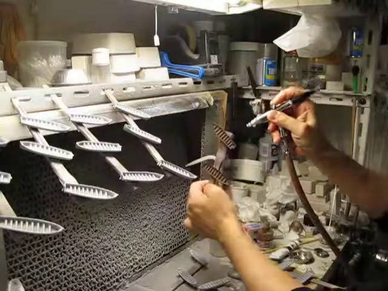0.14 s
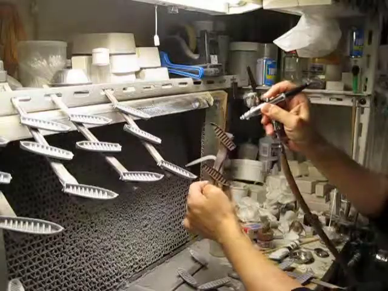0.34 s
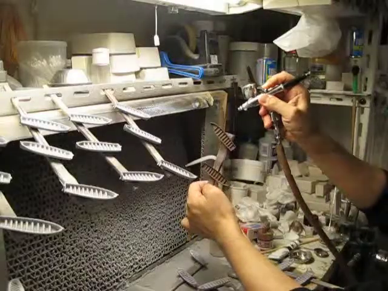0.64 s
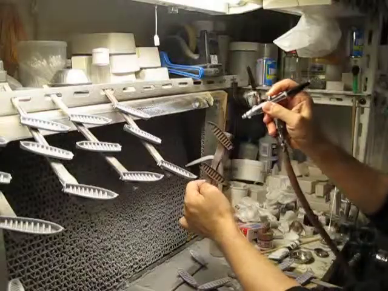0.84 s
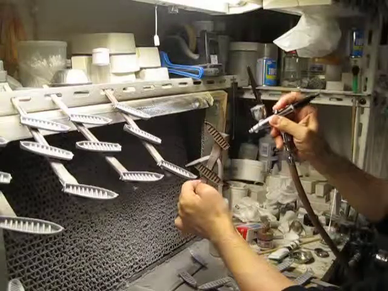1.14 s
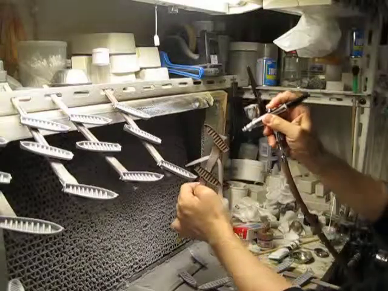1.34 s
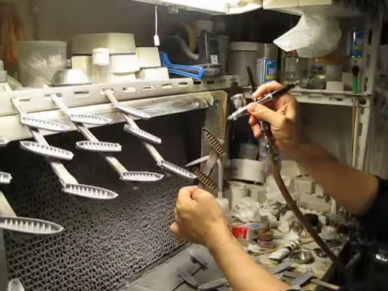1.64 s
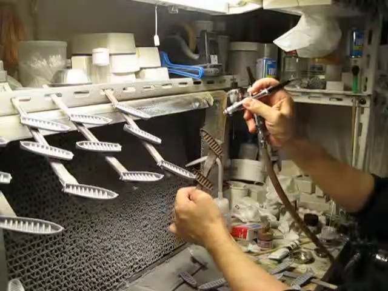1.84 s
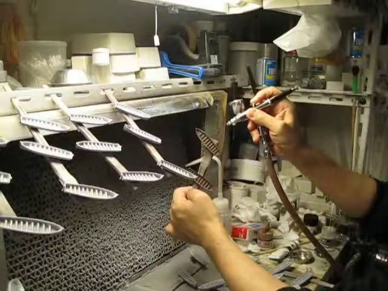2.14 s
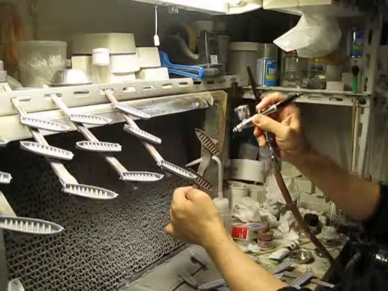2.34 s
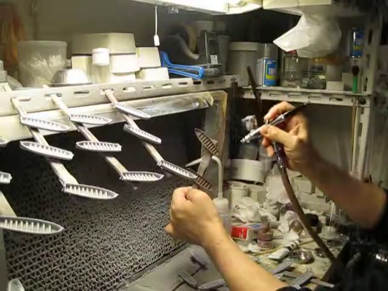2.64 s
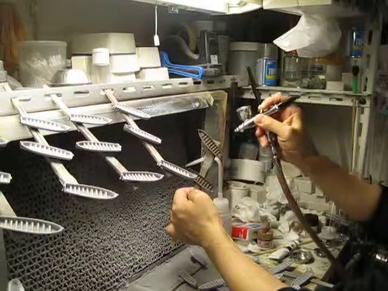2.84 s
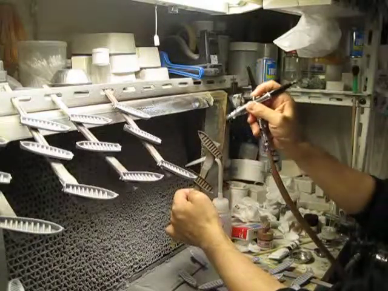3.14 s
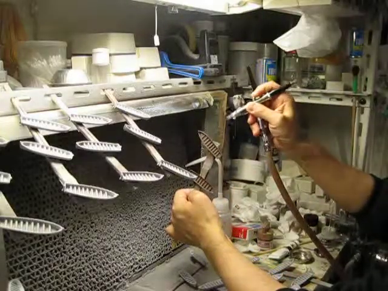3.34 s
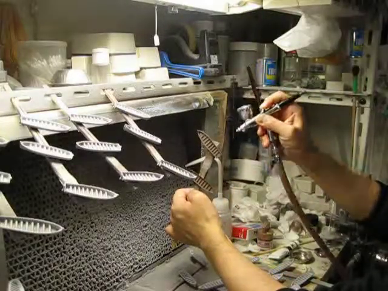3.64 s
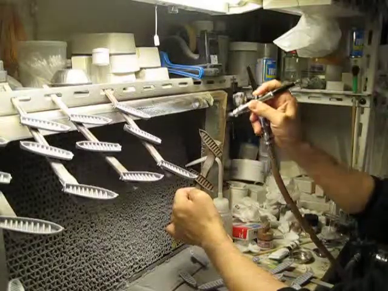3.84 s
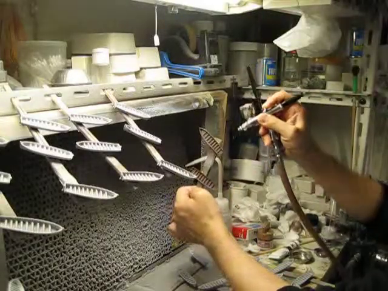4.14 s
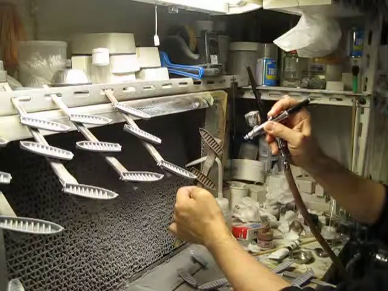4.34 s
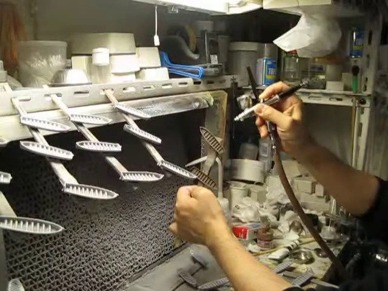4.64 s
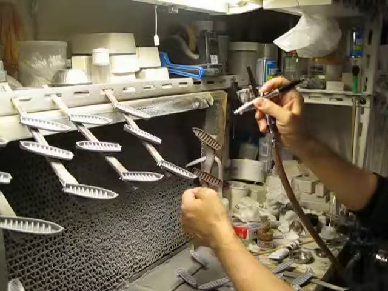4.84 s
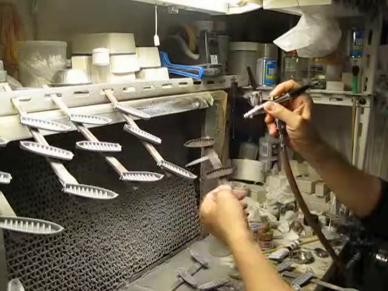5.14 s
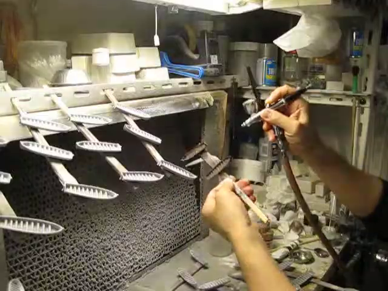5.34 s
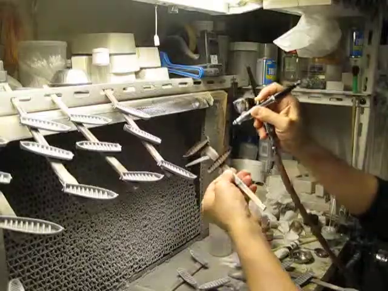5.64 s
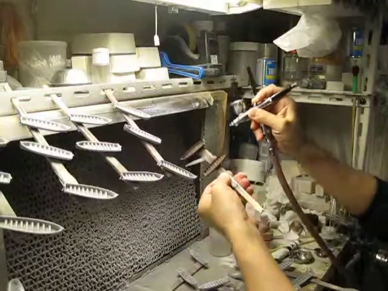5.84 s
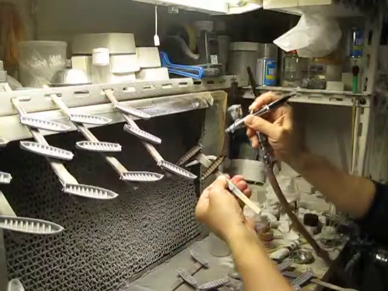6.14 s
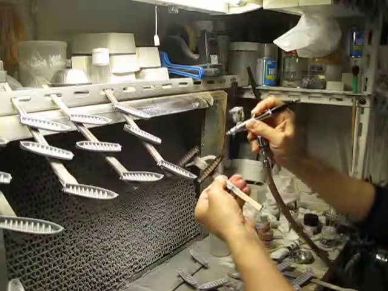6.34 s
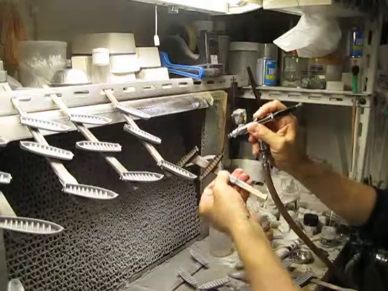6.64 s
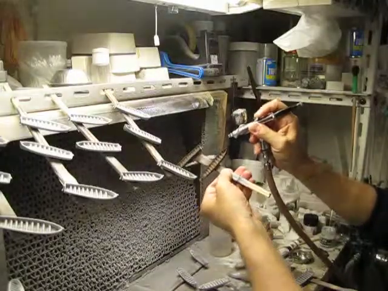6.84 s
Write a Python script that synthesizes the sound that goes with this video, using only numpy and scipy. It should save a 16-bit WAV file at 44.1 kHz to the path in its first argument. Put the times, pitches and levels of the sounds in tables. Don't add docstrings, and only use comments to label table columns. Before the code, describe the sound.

An airbrush hisses steadily, its jet swelling into quick breathy roars over small hollow parts, above a low pulsing compressor hum in a workshop.

```python
import sys
import numpy as np
from scipy import signal
from scipy.fft import rfft, irfft, next_fast_len
from scipy.io import wavfile
from scipy.ndimage import uniform_filter1d, map_coordinates

SR = 44100
rng = np.random.default_rng(int(sys.argv[2]) if len(sys.argv) > 2 else 0)


def dump_mix(stems):
    frames = np.atleast_2d(stems).T
    limited = np.clip(frames, -1, 1)
    pcm = np.round(limited * 32767).astype(np.int16)
    wavfile.write(sys.argv[1], SR, pcm)


def gain_from_decibels(decibels):
    exponent = np.asarray(decibels, float) / 20
    return 10 ** exponent


N = 307818

# (time [s], level [dB])
CAMERA_GAIN = [(0, -4.5), (1.2, -1), (1.7, -3.5), (2.6, -2), (3.0, -2), (3.5, 1), (4.0, 1), (4.8, -0.5),
               (5.7, 3.5), (6.98, 4)]
# (time [s], pose [0 front, 1 aside, 2 turned over])
RACK_POSE = [
    (0, 0),
    (1.8, 0),
    (1.95, 1),
    (3.85, 1),
    (3.97, 0),
    (4.75, 0),
    (5.1, 1),
    (5.3, 2),
    (7, 2),
]

# (multiple of the shaft rate [-], level [dB])
STROKE_ORDERS = [(1, -52.3), (2, -53), (3, -51), (4, -46.5), (6, -45), (7, -49.5), (8, -47.5), (9, -56.5),
                 (10, -48.5), (12, -59), (13, -57.5), (14, -60.5), (18, -61), (23, -58.5), (24, -60),
                 (26, -59), (27, -62.5)]
# (frequency [Hz], level [dB], start angle [rad])
HUM_TONES = [
    (99.96, -47.5, .25),
    (199.93, -60, -2.1),
    (66.55, -53, -.9),
]
# (frequency [Hz], level [dB])
RUMBLE_COLOUR = [(8, -35), (18, -6), (36, -3), (52, 1), (72, 2.5), (86, -8), (125, -6.5), (200, -7.5),
                 (262, -6), (310, -3.5), (420, -8.5), (490, -11), (620, -8), (980, -11), (1900, -23)]

# (frequency [Hz], level [dB])
NOZZLE_COLOUR = [(600, -50), (1000, -24), (2200, -32), (4300, -12), (5600, -13), (7400, -10), (8500, -7.5),
                 (10000, -3.5), (11500, -5), (12800, -6), (13700, -4.5), (15000, -3.5), (16000, -5.5)]
# (frequency [Hz], level [dB])
NOZZLE_TURNED_COLOUR = [(600, -50), (1000, -24), (2200, -16), (4300, -12), (5600, -11), (7800, -10),
                        (8600, -7), (9900, -3.5), (11500, -5), (12900, -6.5), (14000, -3.5), (14800, -4),
                        (16000, -1)]

# (frequency [Hz], level [dB])
ROAR_COLOUR = [(1200, -31), (2000, -9), (3000, -7), (4200, -12), (5600, -12.5), (6500, -16.5), (9000, -26)]
# (frequency [Hz], width [Hz], level [dB])
RACK_FRONT = [(2340, 110, -6.5), (2790, 280, -3.5), (3380, 190, -2.5), (3610, 91, -2.5), (3900, 360, 0.5),
              (4040, 99, 3.5), (4470, 220, -8), (5040, 210, -2.5), (5460, 250, -2), (6040, 270, -1.5)]
# (frequency [Hz], width [Hz], level [dB])
RACK_ASIDE = [(2250, 100, -18), (2840, 230, -3.5), (3340, 240, -4), (3650, 190, -4), (4070, 260, -1.5),
              (4200, 120, -5.5), (4950, 300, -30), (5620, 490, -4), (5800, 180, -10)]
# (frequency [Hz], width [Hz], level [dB])
RACK_TURNED = [(2180, 140, -4.5), (2700, 92, -2), (3170, 210, -8.5), (4240, 680, -1), (5800, 450, -3.5)]
# (frequency [Hz], width [Hz], level [dB])
HOLLOW = [(1710, 100, 1.5), (1810, 110, -7.5), (1860, 75, -1.5), (1543, 100, -7.5)]
# (frequency [Hz], width [Hz], level [dB])
HOLLOW_TURNED = [(1860, 110, -2), (1660, 140, -6), (1470, 110, -11)]
# (frequency [Hz], width [Hz], level [dB])
LOW_PEAKS = [(826, 237, -3), (1089, 45, -0.5), (1306, 165, -1)]
# (frequency [Hz], width [Hz], level [dB])
FIZZ_PEAKS = [(5180, 270, 1.5), (6130, 300, 0.5), (6740, 130, 2), (7150, 310, 1), (7820, 310, -1),
              (8400, 450, 0.5), (9400, 1100, -1), (10130, 250, -1), (11400, 440, -5)]
# (frequency [Hz], width [Hz], level [dB])
FIZZ_TURNED_PEAKS = [(5800, 630, -1.5), (6540, 300, 0), (7200, 500, -6.5), (8900, 1100, -2)]
# (centre [s], length [s], roar [dB], hollow [dB], low edge [dB])
PASSES_UPRIGHT = [(-0.06, 0.45, -22.5, -6, -13), (.196, .15, -22.5, -11.5, -20),
                  (0.402, 0.23, -23.5, -7, -13.5), (0.826, .27, -22, -9.5, -11),
                  (1.095, 0.41, -23, -6, -11.5), (1.292, 0.17, -23.5, -6.5, -19),
                  (1.485, 0.23, -21.5, -11, -15), (1.673, .18, -25, -11, -11.5),
                  (2.192, .31, -21, -11, -12), (2.466, 0.26, -25.5, -5, -12), (2.772, 0.2, -29.5, 0, -12),
                  (2.964, 0.23, -24, -8, -11), (3.08, 0.26, -27, -7.5, -7), (3.387, 0.19, -33.5, -6, -5.5),
                  (3.634, .32, -24, -5.5, -9.5), (3.818, 0.14, -34.5, -5, -6), (4.084, .2, -23.5, -7, -11),
                  (4.27, .22, -22.5, -5, -12.5), (4.487, .14, -23, -5, -12.5),
                  (4.623, 0.15, -24, -7.5, -11), (4.689, 0.074, -28.5, -9, -10)]
# (centre [s], length [s], roar [dB], hollow [dB], low edge [dB])
PASSES_OVER = [(4.87, 0.24, -34, -5, -1.5), (4.98, 0.099, -30, -2, -8), (5.045, 0.053, -29.5, -2, -7),
               (5.13, 0.13, -41, -14, -15), (5.43, 0.31, -37.5, -5.5, -5.5), (5.66, 0.28, -30, -5.5, -9),
               (5.96, .22, -29, -4.5, -7), (6.14, 0.17, -32, -8, -6.5), (6.215, 0.12, -29.5, -6, -6.5),
               (6.46, 0.18, -32, -7, -10), (6.73, 0.25, -30.5, -5, -6), (6.93, 0.12, -29, -5.5, -7)]

NOTCH_HZ = [920, 1035, 1190, 1380, 1590, 1835, 2110, 2360, 2780, 2990, 3080, 3270, 3500, 3560, 3790, 3930,
            4130, 4340, 4560, 4660, 4800, 5000, 5220, 5800, 6400]
NOTCH_DB = [-7, -6.5, 0, -5, -8, -8.5, -0.5, -1.5, -10, -9.5, -5, -6.5, -10.5, -4, -6, 1, -13, 3, -1.5, 1,
            1, 0, -2.5, -9, 3]
# (time [s], low end [Hz], width [Hz])
SIDE_PATCHES = [(0.1, 6300, 1300), (0.1, 12400, 1400), (0.123, 9600, 1400), (1.214, 9600, 1400),
                (2.05, 5600, 2000), (2.05, 9600, 2800), (2.12, 4200, 1100), (2.12, 12400, 1500),
                (2.236, 8300, 1400), (2.305, 4600, 2300), (2.979, 10300, 1400), (3.327, 9000, 1400),
                (3.652, 13100, 2600), (3.815, 5100, 3900), (4.163, 9600, 1400), (4.581, 7700, 3300),
                (4.86, 9600, 1500), (4.999, 13100, 2100), (5.278, 9600, 1500), (5.324, 13800, 1900),
                (5.672, 11700, 1400), (5.765, 11000, 2100), (5.905, 11000, 2200), (6.299, 13800, 1900),
                (6.555, 9600, 1400), (6.648, 9000, 1300), (6.717, 7600, 2000), (6.717, 11000, 1400),
                (6.926, 9600, 1400), (6.926, 14500, 1200)]

SHAFT_HZ, FIRST_STROKE_S = 24.535, .0205
MACHINES_DB, HISS_DB, MIST_DB = 0.3, -30.5, -47.5
MIST_HOLLOW_DB, MIST_LOW_DB = -14, -16
FLANK_DB = 6
FULL_HIT_DB = -24
FIZZ_DB, FIZZ_GROWS = -7.5, 0.9
PATCH, PATCH_OFFSET = 1024, 295
SIDE_DB = -3
TOP_HZ = 15730


def unit(x):
    return x / np.sqrt(np.mean(x ** 2) + 1e-20)


def curves(rows):
    times, *columns = np.transpose(rows)
    return [np.interp(np.arange(N) / SR, times, column) for column in columns]


def along(points, hz):
    f, db = np.transpose(points)
    return gain_from_decibels(np.interp(np.log(hz + 1), np.log(f + 1), db, left=-120, right=-120))


def peaks(modes, hz):
    return np.sqrt(sum(gain_from_decibels(2 * db) / (1 + (2 * (hz - c) / w) ** 2) for c, w, db in modes))


def wobble(rate):
    points = rng.standard_normal(int(N * rate / SR) + 4)
    return map_coordinates(points, [np.arange(N) * rate / SR], order=1)


def filtered(x, gain):
    m = next_fast_len(N + 8192)
    return irfft(rfft(x, m) * gain(np.fft.rfftfreq(m, 1 / SR)), m)[..., :N]


def rush(gain, echo_db, narrow=4, long=9):
    noise = signal.stft(rng.standard_normal(N + 4096), nperseg=2048)[2]
    echo = rng.standard_normal(noise.shape) + 1j * rng.standard_normal(noise.shape)
    for _ in range(2):
        echo = uniform_filter1d(echo, size=int(narrow), axis=0)
        echo = uniform_filter1d(echo, size=int(long), axis=1)
    path = abs(1 + gain_from_decibels(echo_db) * echo / np.std(echo))
    air = signal.istft(noise * path, nperseg=2048)[1][:N]
    return unit(filtered(air, gain))


def posed(*layers):
    pose = np.maximum(curves(RACK_POSE)[0] - (3 - len(layers)), 0)
    return sum(np.sqrt(np.clip(1 - abs(pose - k), 0, 1)) * x for k, x in enumerate(layers))


def machines():
    t = np.arange(N) / SR
    turn = 2 * np.pi * SHAFT_HZ * (t - FIRST_STROKE_S)

    def lag(hz):
        return .6 + 1.4 / (1 + ((hz - 167) / 13) ** 2)

    thud = sum(gain_from_decibels(db + .4 * wobble(2)) * np.cos(k * turn - lag(k * SHAFT_HZ)) for k, db in STROKE_ORDERS)
    hum = sum(gain_from_decibels(db) * np.cos(2 * np.pi * hz * t + angle) for hz, db, angle in HUM_TONES)
    puff = gain_from_decibels(0.48 * np.cos(turn))
    air = rush(lambda hz: along(RUMBLE_COLOUR, hz), echo_db=-12.5, narrow=2.5, long=8.5)
    rumble = gain_from_decibels(-41.5) * puff * air
    return gain_from_decibels(curves(CAMERA_GAIN)[0] + MACHINES_DB) * (gain_from_decibels(2.5) * (thud + hum) + rumble)


def nozzle():
    def hiss(points):
        return rush(lambda hz: along(points, hz), echo_db=-10, narrow=5, long=10)

    level_db = curves(CAMERA_GAIN)[0] + HISS_DB + 0.59 * wobble(30)
    return gain_from_decibels(level_db) * posed(hiss(NOZZLE_COLOUR), hiss(NOZZLE_TURNED_COLOUR))


def passes():
    centre, length, roar_db, hollow_db, low_db = np.transpose(PASSES_UPRIGHT + PASSES_OVER)[..., None]
    t = np.arange(0, N / SR + .01, .005)
    bells = gain_from_decibels(2 * (roar_db - FLANK_DB * (2 * (t - centre) / length) ** 2))
    mist = gain_from_decibels(2 * (MIST_DB + np.interp(t, *np.transpose(CAMERA_GAIN))))
    power = bells.sum(axis=0) + mist

    def share(part_db, mist_db):
        part = (gain_from_decibels(2 * part_db) * bells).sum(axis=0) + gain_from_decibels(2 * mist_db) * mist
        return 10 * np.log10(part / power)

    hollow = share(hollow_db, MIST_HOLLOW_DB)
    low = share(low_db, MIST_LOW_DB)
    return curves(np.transpose([t, 10 * np.log10(power), hollow, low]))


def strike():
    roar_db, hollow_db, low_db = passes()
    low_db = low_db + 2.4 * wobble(12)
    hollow_db = hollow_db + 0.9 * wobble(15)
    fizz_db = FIZZ_DB + (FIZZ_GROWS - 1) * (roar_db - FULL_HIT_DB) + 1.7 * wobble(9.7)

    def body(modes):
        def colour(hz):
            return along(ROAR_COLOUR, hz) * np.hypot(gain_from_decibels(-9.5), peaks(modes, hz))
        return rush(colour, echo_db=-9.5, narrow=4.5, long=6.5)

    def steep(modes, echo_db):
        return rush(lambda hz: peaks(modes, hz) ** 1.16, echo_db, narrow=4.5, long=8.5)

    layers = posed(body(RACK_FRONT), body(RACK_ASIDE), body(RACK_TURNED))
    layers += gain_from_decibels(hollow_db) * posed(steep(HOLLOW, echo_db=-13), steep(HOLLOW_TURNED, echo_db=-9))
    layers += gain_from_decibels(low_db) * steep(LOW_PEAKS, echo_db=-9.5)
    layers += gain_from_decibels(fizz_db) * posed(steep(FIZZ_PEAKS, echo_db=-2.5), steep(FIZZ_TURNED_PEAKS, echo_db=-5))
    eddies = gain_from_decibels(0.59 * wobble(18) + 0.51 * wobble(70) + 0.18 * wobble(400))
    return gain_from_decibels(roar_db) * layers * unit(eddies)


def scene():
    def notches(hz):
        return sum(db / (1 + ((hz - c) / (12 + 0.0018 * c)) ** 2) for c, db in zip(NOTCH_HZ, NOTCH_DB))

    spray = nozzle() + strike()
    turned = np.clip(curves(RACK_POSE)[0] - 1, 0, 1)
    before = filtered(spray, lambda hz: gain_from_decibels(notches(hz)))
    after = filtered(spray, lambda hz: gain_from_decibels(notches(hz) * (hz < 2200)))
    return np.tile((1 - turned) * before + turned * after + machines(), (2, 1))


def side_noise(x):
    side = np.zeros(N + 2 * PATCH)
    fade = signal.windows.kaiser_bessel_derived(2 * PATCH, 4 * np.pi)
    place = np.arange(2 * PATCH) + (1 + PATCH) / 2
    for s, low_hz, width_hz in SIDE_PATCHES:
        ends = np.round(np.array([low_hz, low_hz + width_hz]) * 2 * PATCH / SR)
        lines = np.arange(*ends) + .5
        waves = np.cos(np.pi / PATCH * np.outer(lines, place))
        start = PATCH_OFFSET + PATCH * (round((s * SR - PATCH_OFFSET) / PATCH) - 1)
        here = slice(start, start + 2 * PATCH)
        size = np.std(waves @ (fade * x[here])) * 2 / PATCH
        side[here] += gain_from_decibels(SIDE_DB) * size * fade * (rng.standard_normal(len(lines)) @ waves)
    return np.outer([1, -1], side[:N])


def band_limit(x):
    return signal.sosfilt(signal.butter(12, 16930, fs=SR, output="sos"), x)


def record(dry):
    mix = filtered(dry, lambda hz: hz < TOP_HZ) + side_noise(dry[0])
    return band_limit(mix)


dry = scene()
out = record(dry)
dump_mix(out)
```